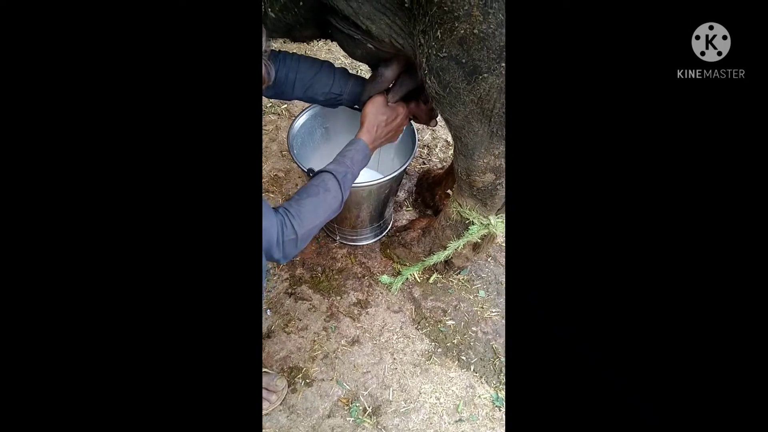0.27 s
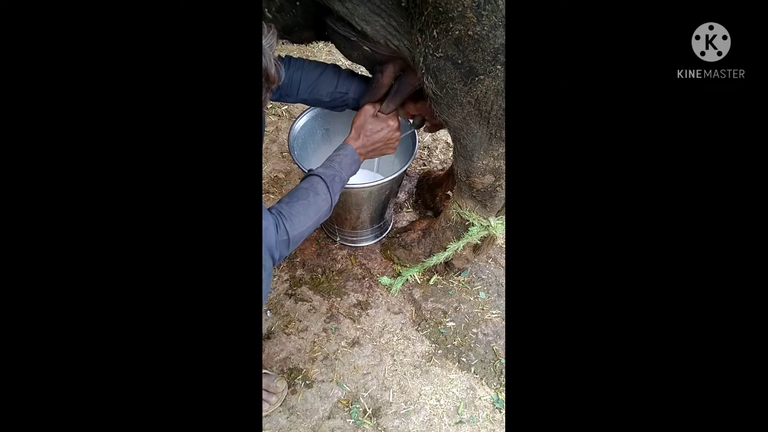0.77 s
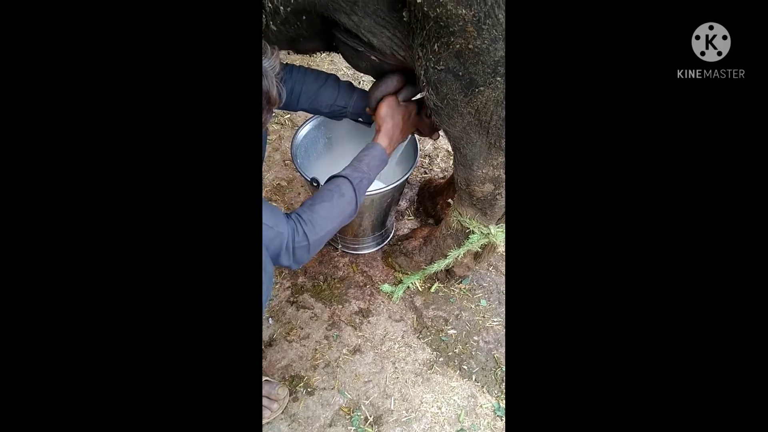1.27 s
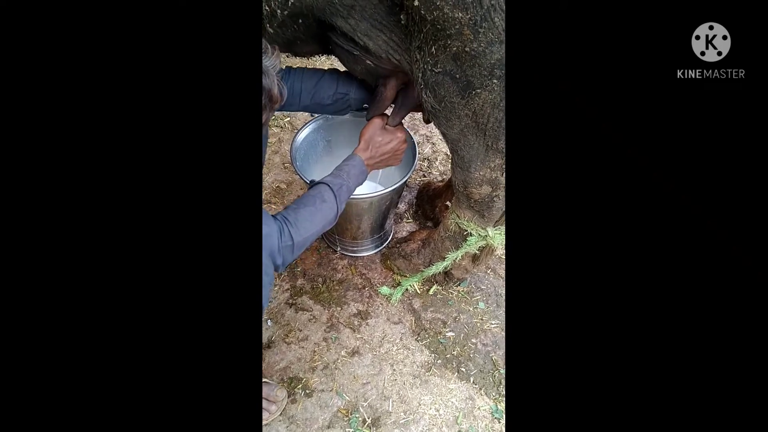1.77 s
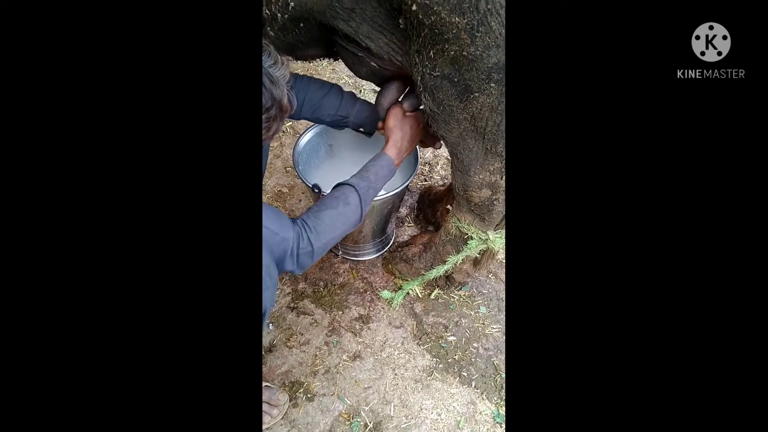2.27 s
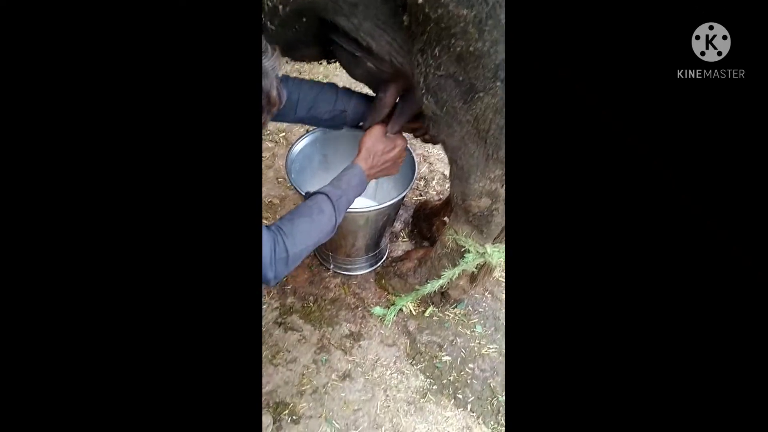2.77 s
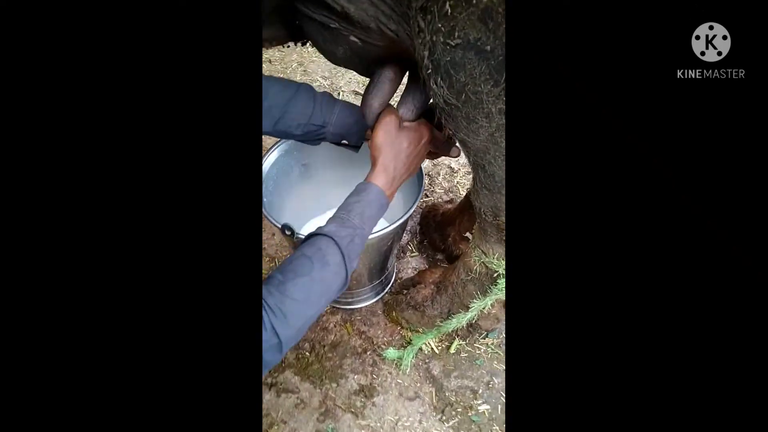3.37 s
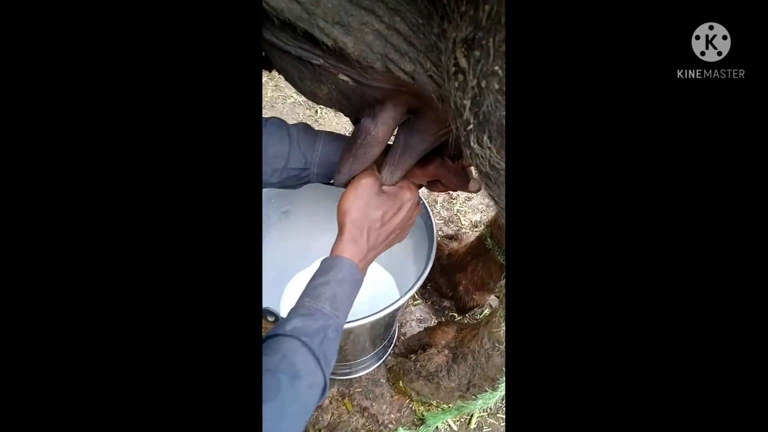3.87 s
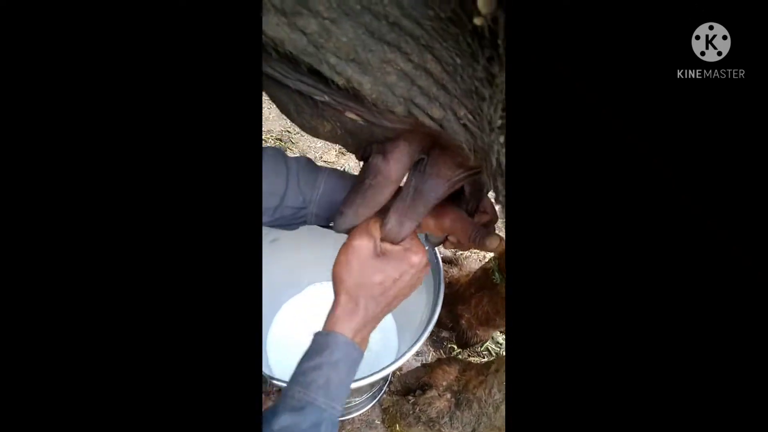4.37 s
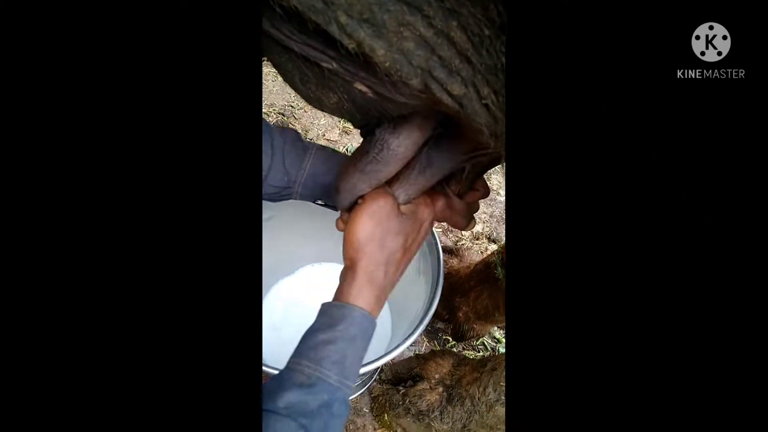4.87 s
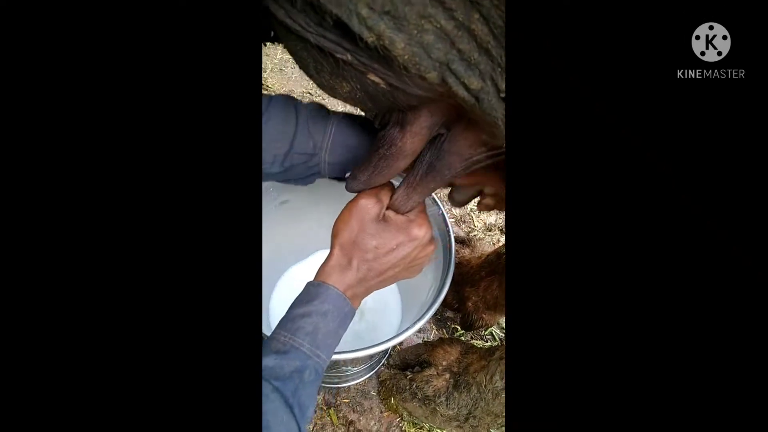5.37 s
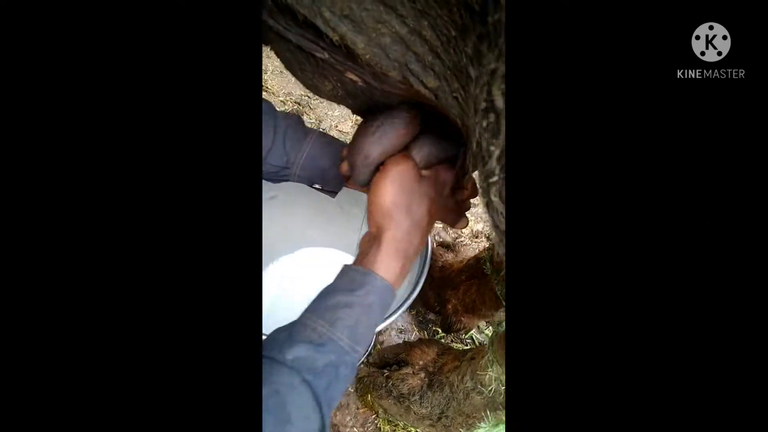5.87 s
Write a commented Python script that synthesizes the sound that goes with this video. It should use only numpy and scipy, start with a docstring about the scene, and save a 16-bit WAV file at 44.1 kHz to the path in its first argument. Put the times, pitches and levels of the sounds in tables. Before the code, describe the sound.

Alternating long and short streams of milk hiss into frothy milk in a steel pail, with gurgles, tiny rim ticks and a faint metallic ring. Soft yard air, light wind and three distant bird whistles lie behind. As the microphone moves in, splashes become fuller and boomier, strongest near four to four and a half seconds, then muffled and faint, ending with a dull handling bump and a last fresh spurt.

```python
"""Milking into a steel bucket

Jets of milk hiss into a bucket that already holds foamy milk, near a hand-held phone. Filtered noise, drops
and bubbles make the splash, which rings the wall and air of the bucket. The phone moves closer and is
shadowed, dulling the treble. A light wind rumbles, a far bird pipes three notes over a soft yard noise,
and near the end a finger slips on the phone."""
import sys
import numpy as np
from scipy import signal
from scipy.fft import rfft, irfft, next_fast_len
from scipy.io import wavfile
from scipy.ndimage import uniform_filter1d

SR = 44100
rng = np.random.default_rng(int(sys.argv[2]) if len(sys.argv) > 2 else 0)


def master_out(mix):
    """Clip the mix to full scale and print it as 16-bit PCM to the path in sys.argv[1]."""
    frames = np.transpose(np.atleast_2d(mix))
    ceiling = np.clip(frames, -1, 1)
    pcm = np.round(ceiling * 32767).astype(np.int16)
    wavfile.write(sys.argv[1], SR, pcm)


N = 269451  # length of the scene in samples


def jets():
    """The stream is noise, drops and bubbles; its bands flicker together, and each also on its own."""
    # Ringing spots of the bucket wall. Each row: pitch in Hz, width in Hz, strength in dB.
    wall_modes = [(1412, 260, -1), (2115, 120, -4.5), (2434, 100, -5), (2794, 170, 0), (3560, 390, -2.5),
                  (4654, 89, 4.5), (6550, 500, -2.5)]
    # Colour of each part of the sound. Each row: frequency in Hz, relative level in dB per Hz.
    gurgle_colour = [(600, -13.5), (1000, 1), (1300, 3), (1600, -2.5), (2200, -8.5), (4000, -69)]
    splash_colour = [(900, -54), (1600, -4), (2100, 5.5), (2900, 2), (3300, -2.5), (4200, -16.5),
                     (8000, -65)]
    sizzle_colour = [(2000, -83), (2900, -7.5), (3300, 3.5), (4200, 2.5), (4900, -12.5), (6000, -16.5),
                     (7000, -60)]
    spray_colour = [(3000, -17), (4300, 2), (4800, -5), (6400, -2), (7200, 0), (8200, -28), (10500, -34),
                    (12000, -2)]
    sheen_colour = [(6000, -31), (7400, 4), (8800, -5.5), (10500, -3.5), (12000, -13), (14000, -26)]
    fizz_colour = [(8000, -18.5), (9800, -13.5), (11500, -8), (13200, -1.5), (16000, -1)]
    # Treble, shadowed as the phone moves. Each row: time in seconds, relative spray level in dB,
    # spray centre in Hz, relative fizz level in dB, fizz centre in Hz.
    treble_path = [(0.0, -41.5, 5200, -41, 13100), (0.25, -41.5, 5460, -37.5, 13600),
                   (0.44, -49.5, 5370, -45.5, 13600), (0.56, -43, 5646, -42.5, 13620),
                   (0.97, -50.5, 5800, -41.5, 13600), (1.07, -46.5, 5900, -39, 13500),
                   (1.26, -40.5, 5340, -36, 13800), (1.44, -45, 5630, -33.5, 13900),
                   (1.68, -43.5, 5430, -44.5, 14000), (1.82, -44, 5640, -38.5, 13680),
                   (1.95, -47.5, 5500, -38, 13800), (2.08, -50.5, 5850, -42, 13830),
                   (2.3, -40.5, 5520, -34, 13800), (2.64, -46, 5100, -31.5, 15290),
                   (2.74, -48, 5480, -40, 14900), (3.25, -48, 5370, -40, 14650),
                   (3.47, -39, 5570, -34.5, 13900), (3.74, -35, 5400, -31, 13300),
                   (3.87, -37.5, 4800, -37.5, 13000), (4.15, -42, 4358, -39.5, 12100),
                   (4.27, -55, 4900, -44.5, 11820), (4.38, -64, 5130, -48, 11300),
                   (4.49, -62, 5220, -46.5, 11400), (4.59, -56, 5060, -41, 11310),
                   (4.93, -64, 4800, -49, 11280), (5.05, -68, 4700, -59.5, 11100),
                   (5.94, -78, 5000, -59.5, 11300), (6.11, -47.5, 4620, -39, 11580)]
    # The thin band between spray and fizz. Each row: time in seconds, relative level in dB.
    sheen_path = [(0.0, -55), (0.9, -59), (1.44, -52), (1.58, -55.5), (2.11, -58), (2.59, -47.5),
                  (2.72, -52.5), (3.15, -50), (3.2, -59), (3.42, -47.5), (3.62, -47.5), (4.51, -72),
                  (4.59, -64), (5.14, -82), (5.9, -87), (6.11, -61)]

    splash_db, surge_db, hollow_hz, sizzle_db, gurgle_db, _ = flow()
    spray_db, spray_hz, fizz_db, fizz_hz = curves(treble_path)
    sheen_db = curves(sheen_path)[0]

    stream = rng.standard_normal(N) + 0.7 * droplets(900, spread_db=1.6) + 0.36 * bubbles()
    stream = stream + sum(gain_of(db) * resonate(stream, hz, width) for hz, width, db in wall_modes)

    # the hollow under the jet has a resonance of its own
    splash = coloured(stream + 2.9 * resonate(stream, hollow_hz, width_hz=1200), splash_colour)
    splash = gain_of(0.9 * flicker(0.006)) * splash
    sizzle = gain_of(sizzle_db + 0.15 * flicker(0.0025)) * coloured(stream, sizzle_colour)
    gurgle = gain_of(gurgle_db + 2.0 * flicker(0.0033)) * coloured(stream, gurgle_colour)

    spray = resonate(resonate(stream, spray_hz, width_hz=2300), spray_hz, width_hz=2560)
    spray = coloured(stream + 5 * spray, spray_colour)
    spray = gain_of(spray_db + 0.5 * flicker(0.0047)) * spray

    spattered = evened(stream) + 0.19 * droplets(250, spread_db=1.5)  # spatter on the rim
    fizz = coloured(spattered + 6 * resonate(spattered, fizz_hz, width_hz=1400), fizz_colour)
    fizz = gain_of(fizz_db + 0.91 * flicker(0.0038)) * fizz
    sheen = gain_of(sheen_db + 0.98 * flicker(0.018)) * coloured(spattered, sheen_colour)

    low = gain_of(splash_db - 3.5) * (splash + sizzle + gurgle)
    high = gain_of(0.22 * surge_db + 0.79 * flicker(0.0065) - 2.0) * (spray + fizz + sheen)
    return gain_of(1.07 * flicker(0.0019) + 0.36 * flicker(0.037)) * (low + high)


def flow():
    """Each spurt rises, holds, cuts off and drips; the stronger it is, the more it sets the colour."""
    # Squirts, short spurts and dribbles of the jet. Each row: start, length and rise in seconds, relative
    # splash level in dB at the start and at the end, centre of the hollow under the jet in Hz, then the
    # levels of sizzle, gurgle and second bucket mode in dB over the splash.
    squirts = [(-0.1, 0.46, .02, -39.5, -38, 2680, -12, -13.5, -15),
               (0.402, 0.15, 0.062, -42.5, -45.5, 2530, -6.5, -12, -2),
               (0.54, 0.226, 0.03, -42, -42, 2680, -1, -1, -5),
               (.78, 0.086, .015, -39.5, -42.5, 2522, -5, -5.5, -7),
               (.9, 0.047, 0.051, -70, -39.5, 2760, -4, -9, -10.5),
               (1.07, 0.42, 0.02, -41.5, -38.5, 2630, -7.5, -13.5, -14),
               (1.577, 0.048, 0.018, -35, -37, 2440, -16, -13, -16.5),
               (1.723, 0.38, 0.033, -43, -44.5, 2599, -2.5, -9, -8),
               (2.096, 0.04, 0.012, -32, -43, 2224, -8, -10, -10),
               (2.192, 0.65, 0.043, -37, -41.5, 2404, -13.5, -13.5, -16),
               (2.8, 0.43, 0.097, -37, -43.5, 2556, -10, -9.5, -9),
               (3.238, .11, 0.034, -39, -43.5, 2400, -11, -11, -12),
               (3.328, 0.41, 0.09, -37.5, -36, 2260, -7, -12, -20.5),
               (3.975, 0.044, 0.031, -31, -32, 2440, -10, -9.5, -18),
               (4.067, .29, 0.013, -34, -37, 2856, -4, -11.5, -22),
               (4.385, 0.17, 0.011, -37.5, -36.5, 2980, -6.5, -15, -18),
               (4.478, 0.5, 0.19, -27.5, -43.5, 2270, -17.5, -9, -19),
               (5.08, 0.34, 0.08, -50.5, -51, 2690, -8.5, 7, -5),
               (5.5, 0.054, .02, -54, -57, 2752, -15, 3, 2),
               (5.602, 0.64, 0.027, -54, -51.5, 2330, -9, -12, -17),
               (5.985, 0.075, 0.03, -43.5, -40.5, 2200, -13, 0, -12),
               (6.03, 0.097, .07, -33.5, -33, 2485, -4, -8, -18)]
    cut_s, drip_db, drip_db_per_s = 0.008, -2.5, -42.5  # after the cut the teat drips on, ever weaker
    mean_s = 0.19  # a surge is the flow over its running mean
    step = 64  # samples from one point of the slow curves to the next
    t = np.arange(0, N + step, step) / SR
    start, length, rise, start_db, end_db, *colours = np.transpose(squirts)[:, :, None]
    after = np.maximum(t - start - length, 0)
    db = start_db + (end_db - start_db) * np.clip((t - start) / length, 0, 1)
    db = db + drip_db * np.minimum(after / cut_s, 1) + drip_db_per_s * after
    power = (np.clip((t - start) / rise, 0, 1) * gain_of(db)) ** 2
    total = power.sum(0)
    splash_db = 10 * np.log10(total)
    surge_db = splash_db - uniform_filter1d(splash_db, round(mean_s * SR / step))
    colour_curves = [(c * power).sum(0) / total for c in colours]  # averages weighted by power
    return curves(np.transpose([t, splash_db, surge_db] + colour_curves))


def bubbles():
    """Trapped air: each bubble rings with slightly rising pitch, fading over 22 cycles; small ones are many."""
    out, t = np.zeros(N), np.arange(1200) / SR
    for hz in np.geomspace(1100, 7000, 22):
        ring = np.sin(2 * np.pi * hz * t * (1 + 0.57 * t))
        ring = ring * np.exp(-t * hz / 22) * np.minimum(t / 0.00044, 1)
        loudness = (hz / 2500) ** 0.85
        out += signal.oaconvolve(droplets(hz / 170, spread_db=2.5), ring * loudness)[:N]
    return evened(out)


def boom():
    """Heavy drops thump the air column above the milk; their steady rain keeps the first mode singing."""
    # The air column. Each row: time in seconds, first mode level in dB, relative slosh level in dB.
    air_levels = [(0, -53.5, -75), (.5, -60.5, -60), (.78, -55, -57), (1, -59, -67.5), (1.58, -58, -57.5),
                  (1.75, -65.5, -64), (2.25, -58, -62), (2.4, -57.5, -50), (2.76, -59, -59),
                  (3.1, -61, -56), (3.3, -54, -51), (3.5, -58.5, -55.5), (4.05, -49, -49.5),
                  (4.73, -54.5, -50.5), (5.0, -52, -50), (5.25, -47.5, -45.5), (5.63, -49.5, -53.5),
                  (5.8, -57.5, -65), (5.99, -43, -51.5), (6.04, -50, -40), (6.11, -47.5, -48)]
    # The first mode swells into a hum. Each row: start in seconds, length in seconds, level in dB
    # added at the start of the swell, pitch in Hz.
    hum_swells = [(0.0, 0.14, -68, 338.6), (0.144, 0.085, -58, 325.3), (.5, 0.2, -52, 330),
                  (0.73, .11, -57, 334.3), (0.888, 0.15, -48.5, 333), (1.35, .07, -52, 334),
                  (1.439, .17, -59, 345.2), (2.467, 0.058, -54, 331.4), (2.54, 0.063, -55, 332),
                  (3.238, 0.16, -53.5, 327.8), (3.482, 0.085, -51, 323), (3.686, 0.21, -54, 317),
                  (3.998, 0.14, -38.5, 339.7), (4.162, 0.14, -66, 308), (4.395, 0.11, -46.5, 314.2),
                  (4.631, 0.13, -43.5, 308), (4.803, 0.1666, -47, 338.6), (5.053, 0.089, -44.5, 324.5),
                  (5.141, 0.063, -40.5, 330.3), (5.234, 0.057, -41, 341.8), (5.336, 0.14, -47, 316),
                  (5.54, 0.05, -41, 316.6), (5.602, 0.096, -50, 327.3), (6.02, 0.06, -37, 337)]
    # Colour of the slosh. Each row: frequency in Hz, relative level in dB per Hz.
    slosh_colour = [(120, -40), (250, -17), (450, 1), (700, -1), (900, -4.5), (1500, -46)]
    base_hz, waver_hz = 325, 2.997  # resting pitch of the first mode and its random waver
    second_hz, split_hz = 867, 73  # the second mode is a close pair
    hum_fade_db = -3  # slope over each swell

    first_db, slosh_db = curves(air_levels)
    splash_db, surge_db, *_, second_db = flow()
    first, pull_hz = gain_of(first_db + 1.1 * flicker(0.12)), np.zeros(N)
    for s, length, db, hz in hum_swells:
        swell = signal.windows.tukey(round(length * SR), 0.45)
        add(first, s, gain_of(db + np.linspace(0, hum_fade_db, len(swell))) * swell)
        add(pull_hz, s, (hz - base_hz) * swell)
    first_hz = base_hz + pull_hz + waver_hz * flicker(0.062)

    thumps = rng.standard_normal(N) + 0.84 * droplets(220, spread_db=2.0)
    hum = evened(resonate(resonate(thumps, first_hz, width_hz=33.0), first_hz, width_hz=590))
    tone = np.sin(2 * np.pi * np.cumsum(first_hz + 4 * flicker(0.021)) / SR)
    hum = evened(hum + 2.34 * tone)

    second = resonate(thumps, second_hz, width_hz=65)
    second = second + 1.4 * resonate(thumps, second_hz + split_hz, width_hz=48)
    second = evened(resonate(second, second_hz + split_hz / 2, width_hz=480))
    second = gain_of(splash_db + second_db + 1.6 * flicker(0.02)) * second

    slosh = gain_of(slosh_db + 0.17 * surge_db + 2.16 * flicker(0.027)) * coloured(thumps, slosh_colour)
    return first * hum + second + slosh


def gulps():
    """Short bursts: a puff of noise with a trapped bubble ringing in it."""
    # The jet breaks up or lands anew. Each row: start in seconds, relative level in dB, centre in Hz.
    gulp_rows = [(0.354, -22.5, 3570), (0.56, -16, 2770), (0.56, -19, 2400), (0.596, -19, 2960),
                 (0.613, -16, 2450), (0.665, -17, 2800), (0.668, -15, 2100), (0.675, -22, 1400),
                 (0.793, -22, 990), (0.793, -19, 2800), (0.819, -18, 3924), (0.819, -20, 2760),
                 (0.846, -15, 2200), (0.847, -18, 3540), (0.895, -15.5, 3550), (0.997, -21, 3140),
                 (1.074, -18.5, 2500), (1.108, -26, 2500), (1.726, -18, 2830), (1.781, -16.5, 2760),
                 (2.102, -23, 2150), (2.192, -19.5, 3290), (2.245, -16.5, 2397), (2.851, -21, 3710),
                 (2.88, -19, 2250), (2.883, -16, 2800), (2.964, -17.5, 2080), (2.967, -21.5, 900),
                 (3.012, -20.5, 900), (3.017, -16.5, 2830), (3.107, -29, 2800), (3.258, -22, 2200),
                 (3.282, -21, 3100), (3.308, -21, 3100), (3.494, -15, 2222), (3.802, -13.5, 2670),
                 (3.921, -16.5, 2800), (4.003, -10, 2626), (4.07, -20, 2830), (4.108, -13, 2460),
                 (4.12, -14, 2780), (4.189, -9.5, 2820), (4.227, -10.5, 2950), (4.288, -17, 2950),
                 (4.396, -20, 1870), (4.507, -16.5, 3280), (4.434, -15.5, 3300), (4.641, -12, 2280),
                 (4.408, -16, 2974), (4.61, -11.5, 2320), (4.958, -23, 2880), (5.385, -30, 2850),
                 (5.562, -29, 2950)]
    out, t = np.zeros(N), np.arange(1500) / SR
    shape = np.minimum(t / 0.0011, 1) * np.exp(-t / 0.0048)
    for s, db, hz in gulp_rows:
        puff = rng.standard_normal(len(t))
        burst = evened(resonate(puff, hz, width_hz=190))
        burst = burst + 0.08 * evened(resonate(puff, 1900, width_hz=1900))
        burst = resonate(resonate(burst, hz, width_hz=1300), hz, width_hz=1700)
        add(out, s, gain_of(db - 25.5) * evened(shape * burst))
    return out


def rings():
    """Foam pockets rung by the jet: narrow, flickering hisses that stop when the pocket closes."""
    # Pockets in the foam. Each row: start in seconds, length in seconds, pitch in Hz, level in dB.
    pockets = [(0.039, 0.29, 2850, -48.5), (0.261, 0.046, 3780, -43.5), (0.405, 0.49, 2780, -48),
               (0.553, 0.326, 2160, -48.5), (0.806, 0.113, 3660, -46), (1.052, 0.575, 2430, -47),
               (1.697, 0.24, 2770, -48), (1.892, 0.127, 4000, -48.5), (2.2, 0.83, 2340, -52),
               (2.852, 0.294, 2820, -46), (2.7, 0.59, 2100, -54), (3.004, 0.26, 3610, -47.5),
               (3.256, 0.079, 3120, -46), (3.35, 0.33, 2090, -43.5), (3.505, 0.29, 3560, -42),
               (3.52, 0.358, 2770, -40.5), (3.84, .13, 2820, -41.5), (6.002, 0.046, 2195, -43.5),
               (4.091, 0.268, 2880, -38), (4.099, 0.18, 3550, -43), (3.983, 0.29, 4430, -45),
               (4.0, 0.21, 5500, -50), (4.549, 0.18, 2362, -40), (4.55, 0.4, 1800, -47.5),
               (4.9, 0.19, 2730, -54), (5.1, 0.356, 2830, -51), (5.42, 0.152, 2910, -56.5),
               (5.36, 0.12, 1704, -53), (5.0, 0.42, 2470, -55), (4.297, 0.28, 3350, -55)]
    out = np.zeros(N)
    for s, length, hz, db in pockets:
        hiss = rng.standard_normal(N) + 0.93 * droplets(500, spread_db=3.0)
        hiss = (hiss * gain_of(0.87 * flicker(0.005)))[:round(length * SR)]
        hiss = resonate(resonate(hiss, hz, width_hz=200), hz, width_hz=540)
        # slower rise, quick end
        rise, fall = np.linspace(0, 5.5, len(hiss)), np.linspace(16, 0, len(hiss))
        add(out, s, gain_of(db) * evened(hiss) * np.minimum(rise, fall).clip(0, 1))
    return out * gain_of(0.47 * flicker(0.0076))


def ticks():
    """Drops tick on the rim: short clicks of noise, mostly bright, a few low, each with a softer broad click."""
    # Drops on the rim. Each row: start in seconds, relative level in dB, pitch in Hz.
    rim_drops = [(1.0737, -15, 13400), (1.131, -23, 13400), (1.9505, -24, 14400), (2.1194, -15, 13420),
                 (2.143, -18, 14500), (2.151, -13.5, 13600), (2.1956, -17, 14100), (2.2338, -29, 13100),
                 (2.2824, -20, 14230), (2.6861, -23, 14730), (3.0734, -22, 14600), (3.2935, -31, 14100),
                 (3.8964, -22, 12900), (3.937, -14, 13300), (4.2957, -29, 11220), (4.397, -23, 1400),
                 (4.408, -28, 4205), (4.434, -27, 4600), (4.486, -31, 4000), (4.94, -31, 14500),
                 (4.949, -33, 14500), (5.151, -41, 14800), (5.16, -43, 14800), (5.2395, -38, 11220),
                 (5.358, -38, 12270), (5.359, -42, 14500)]
    out, t = np.zeros(N), np.arange(400) / SR
    for s, db, hz in rim_drops:
        puff = rng.standard_normal(len(t))
        click = evened(resonate(puff, hz, width_hz=560))
        broad = evened(resonate(resonate(puff, 5600, width_hz=3000), 5600, width_hz=3000))
        add(out, s, gain_of(db - 9.5) * np.exp(-t / 0.001) * (click + 0.18 * broad))
    return out


def plops():
    """Each heavy drop makes a dull plop: a low swing that dies away."""
    # Heavy drops. Each row: start in seconds, level in dB before the fade, pitch in Hz, fade in seconds.
    heavy_drops = [(0.896, -39.5, 166, 0.0064), (3.975, -31, 406, 0.0041), (4.486, -28, 714, 0.0014),
                   (5.239, -26, 359, 0.012), (5.575, -39, 181, 0.0063)]
    out, t = np.zeros(N), np.arange(3000) / SR
    for s, db, hz, fade in heavy_drops:
        add(out, s, gain_of(db) * np.sin(2 * np.pi * hz * t) * np.exp(-t / fade))
    return out


def finger():
    """A finger slips on the phone: the case is pulled slowly inward, snaps out, and settles."""
    # Each row: time of the snap in seconds, pull level in dB, snap level in dB, sharpness in Hz,
    # settling rate (a plain number, higher is quicker).
    slips = [(5.881, -37, -36, 90, .45), (5.9431, -16, -22, 240, .35), (5.9523, -12, -8.9, 270, 1.1),
             (5.9621, -18, -25, 230, .25), (5.9693, -27, -25, 190, .4), (5.9792, -30, -25, 140, .4),
             (5.997, -31, -35, 130, .45)]
    out, t = np.zeros(N), np.arange(-600, 900) / SR
    for s, pull_db, snap_db, hz, settle in slips:
        u = 2 * np.pi * hz * t
        pull = np.exp(np.minimum(u, 0) * 0.5) * (1 - np.tanh(u * 1.3))
        snap = np.exp(-np.logaddexp(0, 2 * u) / 2 * settle) * (1 + np.tanh(u * 1.3))
        catch = 0.28 * np.exp(-((t + 0.00085) / 0.00032) ** 2)  # the skin catches just before it lets go
        inward = gain_of(pull_db) * (pull / pull.max() + catch)
        outward = gain_of(snap_db) * snap / snap.max()
        add(out, s + t[0], outward - inward)
    return out


def bird():
    """Short soft whistles from far away: sine tones that swell and fade."""
    # Each row: start in seconds, length in seconds, pitch in Hz, peak level in dB.
    notes = [(1.355, 0.06, 1422, -47.5), (1.586, 0.069, 1305, -45.5), (1.958, 0.14, 1308, -46)]
    out = np.zeros(N)
    for s, length, hz, db in notes:
        t = np.arange(0, length, 1 / SR)
        add(out, s, gain_of(db) * np.sin(np.pi * t / length) * np.sin(2 * np.pi * hz * t))
    return out


def wind():
    """Wind at the microphone port: a lumpy low rumble of filtered noise."""
    # Each row: time in seconds, level in dB.
    wind_level = [(0, -61), (1.7, -59), (2.17, -59), (2.5, -55), (2.9, -58.5), (3.8, -57.5), (4.5, -57),
                  (4.75, -53.5), (5.5, -54.5), (5.57, -48), (5.78, -46.5), (5.89, -44), (6.01, -44),
                  (6.11, -57)]
    # Each row: frequency in Hz, relative level in dB per Hz.
    rumble_colour = [(10, -8), (36, 5), (60, -1), (120, -1), (250, -19.5), (500, -51)]
    level = gain_of(curves(wind_level)[0] + 0.39 * flicker(0.08))
    return level * coloured(rng.standard_normal(N), rumble_colour)


def yard():
    """The soft background of the yard: filtered noise whose level flickers."""
    # Each row: frequency in Hz, relative level in dB per Hz.
    yard_colour = [(88, -19), (150, -19), (260, -4.5), (335, -0.5), (410, -3), (583, -13), (1150, -8.5),
                   (1540, -15), (2450, -38), (3550, -30), (5540, -45), (8830, -53), (11400, -17),
                   (15500, -75)]
    level_db = -55.5 + 1.2 * flicker(0.03)
    return gain_of(level_db) * coloured(rng.standard_normal(N), yard_colour)


def gain_of(db):
    """Turns dB into a plain factor."""
    return 10 ** (np.asarray(db) / 20)


def evened(x):
    """Scales a sound to an rms (average strength) of 1."""
    return x / np.sqrt(np.mean(x ** 2) + 1e-20)


def curves(rows):
    """Each column of a table after the time column, as a curve over all samples."""
    s, *columns = np.transpose(rows)
    return [np.interp(np.arange(N) / SR, s, c) for c in columns]


def coloured(x, points):
    """Filters by a spectrum drawn through the points and returns rms 1."""
    size = next_fast_len(N)
    hz, db = np.transpose(points)
    f = np.fft.rfftfreq(size, 1 / SR)
    gain = gain_of(np.interp(np.log(f + 1), np.log(hz), db))
    return evened(irfft(rfft(x, size) * gain, size)[:N])


def resonate(x, hz, width_hz):
    """Shifts the pitch hz (fixed or a curve) down to zero, smooths, and shifts back: a resonance of gain 1."""
    turn = np.exp(2j * np.pi * np.cumsum(hz * np.ones(len(x))) / SR)
    r = np.exp(-np.pi * width_hz / SR)
    return 2 * (turn * signal.lfilter([1 - r], [1, -r], x / turn)).real


def flicker(seconds):
    """Smooth chance of rms 1 that changes over the given time."""
    span = max(round(seconds * SR), 2)
    return evened(uniform_filter1d(uniform_filter1d(rng.standard_normal(N), span), span))


def droplets(per_s, spread_db):
    """Sparse impacts of random sign, a few of them large."""
    size = gain_of(spread_db * np.minimum(rng.exponential(1, N), 4))
    size = size * rng.choice([-1., 1.], N)
    return evened(size * (rng.random(N) < per_s / SR))


def add(mix, s, sound):
    """Adds a sound into the mix from second s on, cut at the end of the mix."""
    part = mix[round(s * SR):][:len(sound)]
    part += sound[:len(part)]


def scene():
    """The milk in the bucket, the finger on the phone, and the outdoors around them."""
    milk = jets() + boom() + gulps() + rings() + ticks() + plops()
    return (milk + finger() + bird() + wind() + yard())[None]


def record(dry):
    """The band limit of the recorder: a steep filter that takes away the highest treble."""
    edge_hz = 15560
    low_pass = signal.firwin(1023, edge_hz, window=("kaiser", 9), fs=SR)
    return signal.oaconvolve(dry, low_pass[None], "same")


dry = scene()
out = record(dry)
master_out(out)
```